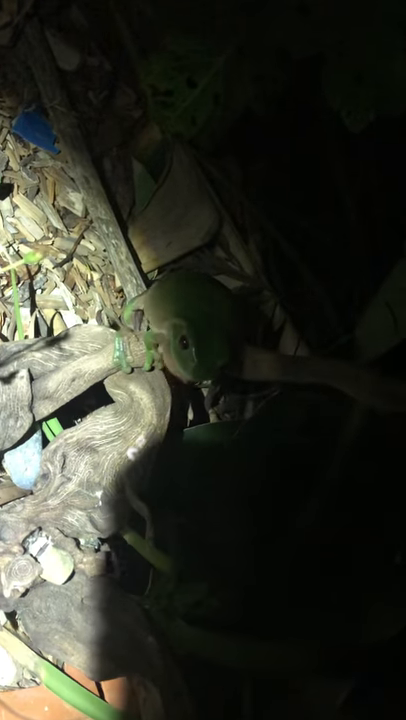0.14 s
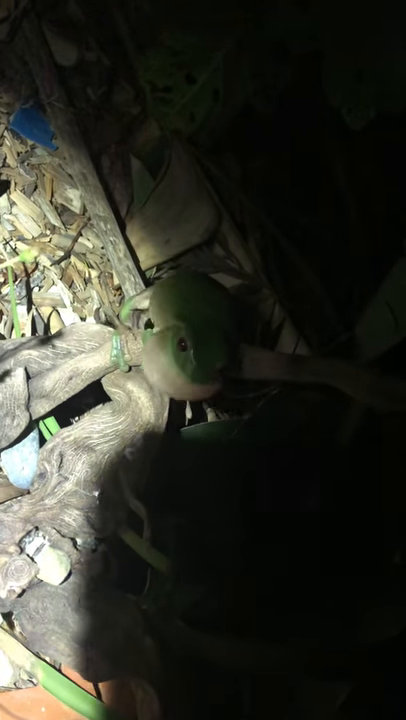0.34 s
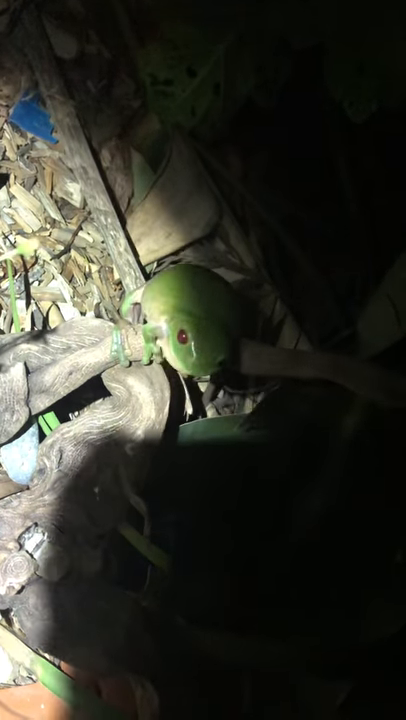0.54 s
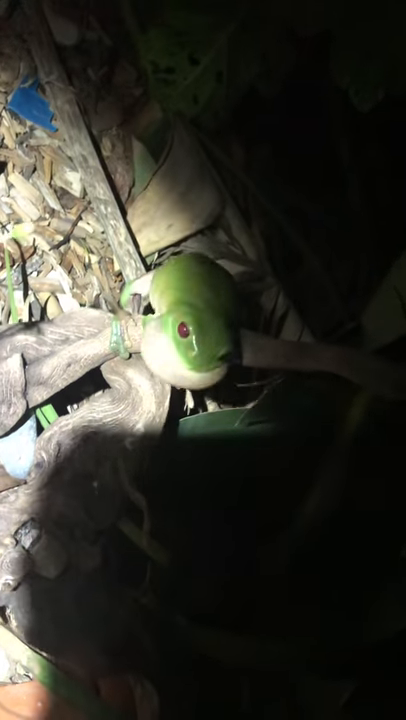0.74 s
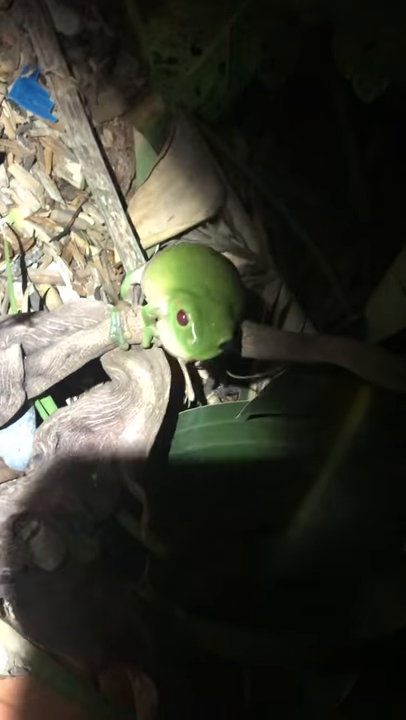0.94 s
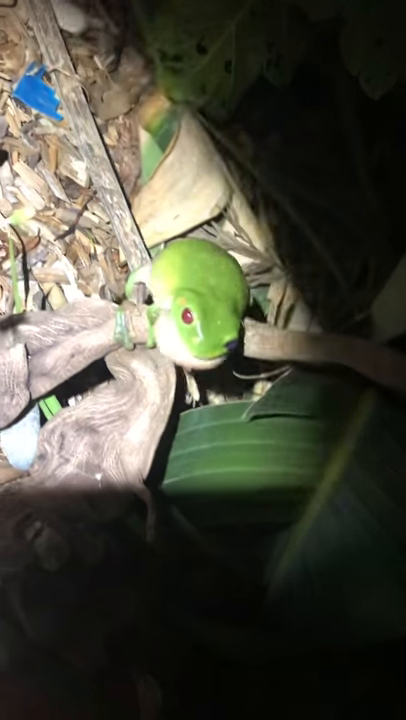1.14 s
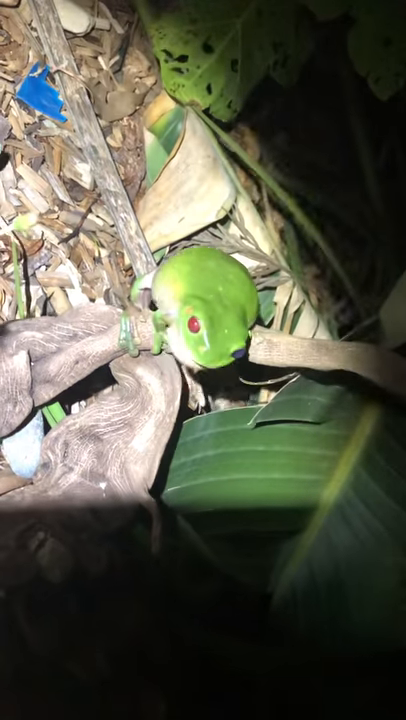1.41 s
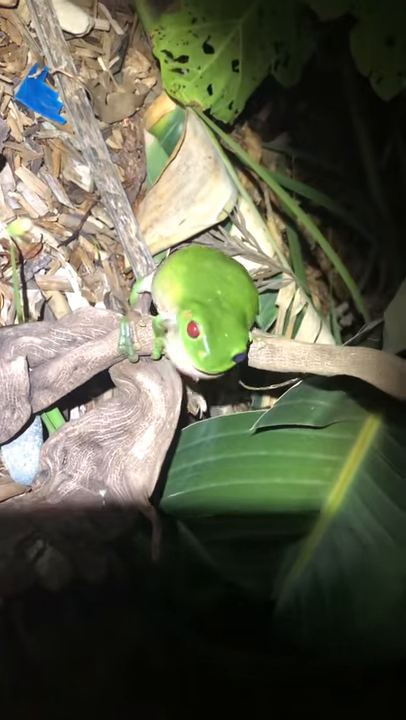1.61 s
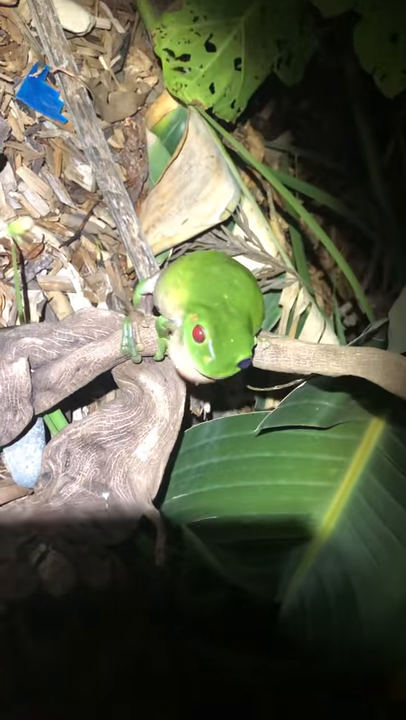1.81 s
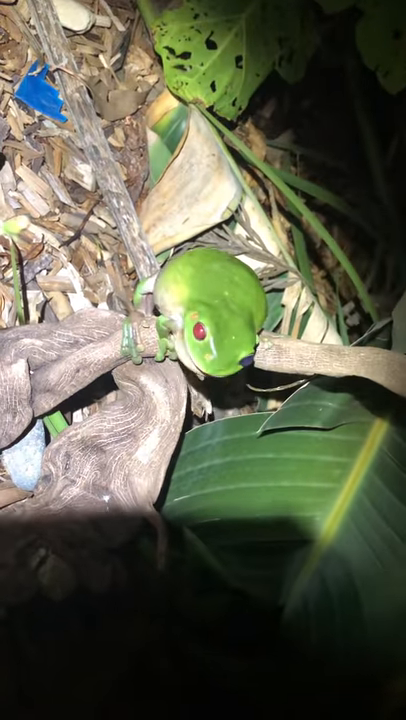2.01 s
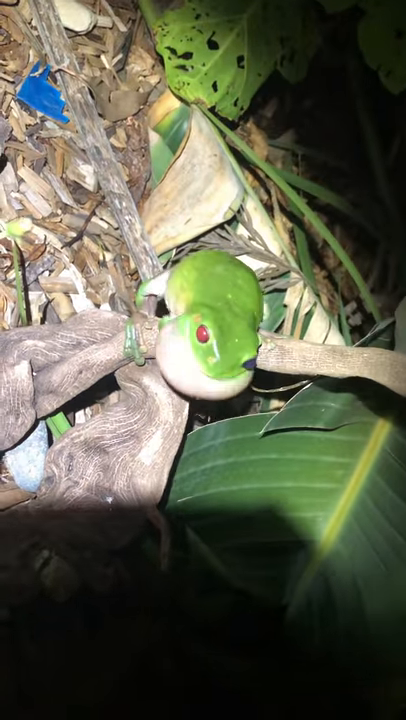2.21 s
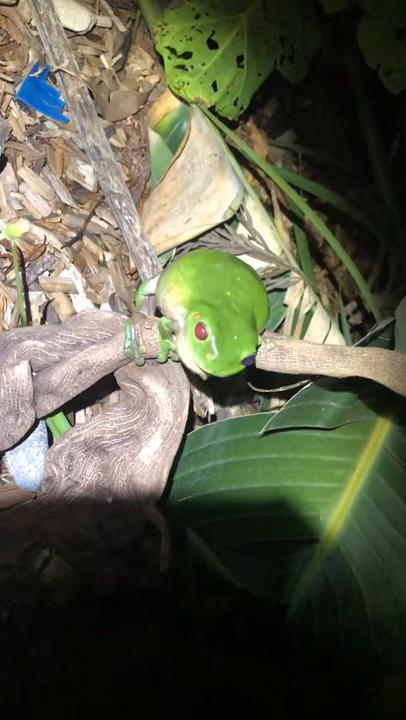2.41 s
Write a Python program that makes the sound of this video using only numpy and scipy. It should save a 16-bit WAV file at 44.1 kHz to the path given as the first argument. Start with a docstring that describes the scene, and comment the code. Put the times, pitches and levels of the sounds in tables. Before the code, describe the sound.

Close to the microphone, a tree frog croaks harshly five times, about twice a second. A softer, farther frog calls between the croaks and once afterward, with tiny dry clicks and a faint hum of night creatures among the leaves.

```python
"""Night among leaves: over a low rumble and a faint chorus, a far frog is just ending a call.
Then a tree frog croaks five times close by, each croak a train of larynx pulses ringing the vocal sac.
The pulses run evenly as it swells, then limp in pairs or threes (the fourth croak holds one run),
and the pitch sags as it stops. The far frog answers in each gap, with a few tiny dry clicks between,
and calls once more after the last croak."""
import sys
import numpy as np
from scipy import signal
from scipy.fft import rfft, irfft, next_fast_len
from scipy.io import wavfile
from scipy.ndimage import uniform_filter1d, minimum_filter1d, map_coordinates

SR = 44100
rng = np.random.default_rng(int(sys.argv[2]) if len(sys.argv) > 2 else 0)


def generate_wav(sig):
    """Save sig (samples, or channels by samples) to the path in sys.argv[1] as 16-bit PCM at SR."""
    pcm = np.round(np.clip(np.atleast_2d(sig).T, -1, 1) * 32767).astype(np.int16)
    wavfile.write(sys.argv[1], SR, pcm)


N = 112454
PULSE = 2048  # samples in the ring of one pulse
T = np.arange(PULSE) / SR

RISE_GAP_MS, LONG_GAP_MS = 7.3, 7.84  # between pulses while swelling; between groups
SLACK_MS, SETTLE_S = 1.1, 0.027  # the gap within a group starts longer and settles
TIRING, TIRING_S = 0.054, 0.049  # pulses slow by this share as the croak runs out
FILL_LEAD_S, FILL_S = 0.046, 0.071  # the sac tightens from just before full effort
BRIGHT_EFFORT, SAG_S = 0.37, 0.079  # effort that fully opens the tone; length of the final sag
SAC_DB, LEADER_DB, SCATTER_DB = 22.5, -4, 2.42  # sac gain; trim on a group's first pulse; random spread
RASP_DB, RASP_T60_S = -27.5, 0.028  # air in each pulse
ANSWER_S, ANSWER_RISE_S, ANSWER_GAP_MS, ANSWER_JITTER_MS, ANSWER_DB = 0.29, 0.11, 7.7, 0.3, 2.5
NEAR_WET_DB, FAR_WET_DB = -27, -2.5  # sends to the garden's reverb


def amp(db):
    """Decibels to amplitude."""
    return 10 ** (np.asarray(db) / 20)


def unit(x):
    """Scale to rms 1."""
    return x / np.sqrt(np.mean(x ** 2) + 1e-20)


def along(points, hz):
    """Read a curve of (Hz, value) points on a log frequency axis."""
    f, v = np.transpose(points)
    return np.interp(np.log(hz + 1), np.log(f + 1), v)


def filtered(x, response):
    """Equalise x with a gain that is a function of frequency."""
    m = next_fast_len(N + SR // 2)
    return irfft(rfft(x, m) * response(np.fft.rfftfreq(m, 1 / SR)), m)[:N]


def noise(spectrum):
    """Coloured noise of rms 1."""
    return unit(filtered(rng.standard_normal(N), lambda hz: amp(along(spectrum, hz))))


def wobble(rate):
    """A smooth random curve, rate knots a second."""
    return map_coordinates(rng.standard_normal(int(N * rate / SR) + 4), [np.arange(N) * rate / SR])


def ring(spectrum):
    """The minimum-phase ring of a body with this spectrum."""
    cepstrum = irfft(np.log(amp(along(spectrum, np.fft.rfftfreq(PULSE, 1 / SR)))))
    cepstrum[1:PULSE // 2] *= 2
    cepstrum[PULSE // 2 + 1:] = 0
    return irfft(np.exp(rfft(cepstrum)))


def add(track, s, sound):
    """Mix a sound into the track at time s."""
    i = round(s * SR)
    if 0 <= i < N:
        track[i:i + len(sound)] += sound[:N - i]


def night(rumble_db=-58, waver_db=1.5):
    """The bed: low rumble and the wavering bands of distant frogs and insects."""
    # The rumble's tone. Each row: frequency in Hz, relative level in dB.
    rumble = [(20, -31), (55, -3), (100, 0), (160, -5), (240, -9.5), (500, -17.5), (900, -19),
              (2500, -30.5), (5000, -35.5), (16000, -41.5)]
    # The chorus bands. Each row: centre in Hz, half-width in Hz, level in dB.
    chorus = [(1050, 43, -63), (1665, 90, -62), (3130, 73, -79.5), (6830, 120, -80)]
    bed = amp(rumble_db) * noise(rumble)
    for centre, width, db in chorus:
        band = filtered(rng.standard_normal(N), lambda hz: 1 / (1 + ((hz - centre) / width) ** 2))
        bed += unit(band) * amp(db + waver_db * wobble(34))
    return bed


def garden(x, predelay_s=0.013):
    """Scatter from plants and walls; each frequency dies at its own speed."""
    # The tail's length. Each row: frequency in Hz, t60 in seconds.
    decay = [(150, 0.21), (400, 0.16), (1150, 0.25), (3200, 0.38), (10000, 0.092)]
    # The tail's tone. Each row: frequency in Hz, gain in dB.
    colour = [(150, -13.5), (280, -12.5), (385, -4), (480, -12), (700, -8), (1150, -1), (1500, -7.5),
              (2200, -6.5), (3100, -5.5), (3900, -5.5), (10000, -5.5)]
    hz, t, bands = signal.stft(rng.standard_normal(SR // 2), SR, nperseg=256)
    tail = signal.istft(bands * amp(-60 * t / along(decay, hz)[:, None]), SR, nperseg=256)[1]
    delayed = np.pad(x, (round(predelay_s * SR), 0))
    wet = signal.fftconvolve(delayed, tail / np.linalg.norm(tail))[:N]
    return filtered(wet, lambda hz: amp(along(colour, hz)))


def ticks():
    """A few tiny dry clicks, each a fast-dying burst of noise."""
    # The clicks. Each row: start in seconds, level in dB, t60 in seconds.
    clicks = [(0.6327, -41.5, 0.0095), (0.847, -52, 0.0069), (1.593, -57, 0.058), (2.493, -62, 0.063)]
    # Their tone. Each row: frequency in Hz, relative level in dB.
    colour = [(300, -10), (3000, 3), (6000, -2), (15000, -8)]
    envelope = np.zeros(N)
    for s, db, t60 in clicks:
        add(envelope, s, amp(db - 60 * T / t60))
    return envelope * noise(colour)


def sac_lag(pulse, centre_hz=1450, q=2.14):
    """The sac takes a moment to respond: an all-pass makes its main ring build up before it dies."""
    hz = np.fft.rfftfreq(PULSE, 1 / SR)
    pole = centre_hz ** 2 - hz ** 2 + 1j * hz * centre_hz / q
    return irfft(rfft(pulse) * np.conj(pole) / pole)


def far_frog():
    """A second frog answers: near-even pulses swell, hold and stop short."""
    # Its calls. Each row: stop in seconds, relative level in dB.
    answers = [(0.046, -1.5), (.496, -2), (.971, -2.5), (1.443, -3), (1.906, -2), (2.371, -1.5)]
    # Its tone. Each row: frequency in Hz, relative level in dB.
    colour = [(100, -39), (270, -12), (340, 1), (385, 4), (450, -2), (520, -0.5), (620, -6.5), (900, -6),
              (1150, 8.5), (1400, -3.5), (1800, -12), (2550, -20), (3250, -13), (3600, -34.5),
              (4100, -47.5), (6300, -58.5), (7700, -38.5), (9000, -55), (16000, -70.5)]
    voice, pulse = np.zeros(N), sac_lag(ring(colour))
    for stop, db in answers:
        gap_luck, level_luck = rng.standard_normal((48, 2)).T
        times = stop - np.cumsum(ANSWER_GAP_MS + ANSWER_JITTER_MS * gap_luck) / 1000
        for s, luck in zip(times, level_luck):
            swell = np.clip((s - stop + ANSWER_S) / ANSWER_RISE_S, 0, 1)
            add(voice, s, swell * amp(ANSWER_DB + db + 1.6 * luck) * pulse)
    return voice


def larynx(full, rise, stop, group, short_ms, feeble_db=-46.5, swell_db=-5):
    """Pulses of one croak as (seconds, strength, leads a group): a swell, then groups that tire."""
    pulses, before = [], RISE_GAP_MS / 1000
    while before < rise:  # the swell, laid backwards from full effort
        early = before / rise
        strength = amp(feeble_db) + amp(swell_db) * (1 - early) ** 2.19
        pulses.insert(0, (full - before, strength, False))
        before += RISE_GAP_MS * (1 - 0.3 * early ** 2) / 1000  # the first pulses come closer
    s, k = full, 0
    while s < stop:
        pulses.append((s, 1, k % group == 0))
        k += 1
        gap_ms = LONG_GAP_MS if k % group == 0 else short_ms + SLACK_MS * np.exp((full - s) / SETTLE_S)
        s += gap_ms * (1 + TIRING * max(0, 1 - (stop - s) / TIRING_S)) / 1000
    return pulses


def vocal_sac(fill, pitch, opening, leads):
    """One ring of the sac: its tone shifts as it tightens; weak and leading pulses are duller."""
    # The sac's resonances. Each row: frequency in Hz, relative level in dB when slack, and when taut.
    resonances = [(60, -91, -38), (180, -38, -29), (252, -37, -7), (321.7, 11.5, 0.5), (405, 21, 13),
                  (440, -3, 8.5), (623, 8.5, 0.5), (800, 9.5, 5.5), (930, 17, 7), (1234, 19, 11),
                  (1502, 6.5, 15), (1659, -5, 4.5), (1808, -3.5, -11), (1990, 0, -3.5), (2740, -12.5, -14),
                  (3250, -9.5, -19.5), (3150, -52.5, -48.5), (4740, -47, -42), (5200, -64.5, -60.5),
                  (6200, -51, -67), (9860, -60, -74), (16000, -58.5, -72)]
    # EQ on the feeblest pulses. Each row: frequency in Hz, gain in dB.
    weak_eq = [(300, 9), (700, 3.5), (1000, 1), (1500, -21.5), (3000, -7), (4000, -27), (16000, -20)]
    # EQ on the first pulse of a group. Each row: frequency in Hz, gain in dB.
    leader_eq = [(1500, -1.5), (3000, -1), (6000, -3.5), (16000, -1.5)]
    hz, slack, taut = np.transpose(resonances)
    dull = (1 - opening) * along(weak_eq, hz) + leads * along(leader_eq, hz)
    level = slack + fill * (taut - slack) + dull
    return sac_lag(ring(np.c_[hz * pitch ** 0.38, level]))  # the sac follows only part of the sag


def throat(fill, pitch, opening, level_luck, attack_s=0.00034):
    """The throat's bright overtones for one pulse; they ring longer when it is taut."""
    # The overtones. Each row: frequency in Hz before bends, relative level in dB, slack t60 in seconds.
    overtones = [(3891, -17, 0.014), (4250, -27, 0.015), (5184, -38.5, 0.018), (8040, -43.5, 0.019),
                 (9900, -55, 0.024), (14700, -47.5, .012)]
    lowest_hz = overtones[0][0]
    glide = 1 - 0.13 * (1 - opening)  # they start flat and rise with effort
    ping = np.zeros(PULSE)
    for (hz, db, t60), luck in zip(overtones, level_luck):
        bend = glide * pitch ** (1 + 2 * (1 - lowest_hz / hz))  # higher ones sag further
        envelope = amp(db + 2 * luck - 60 * T / (t60 * 1.26 ** fill))
        ping += envelope * np.sin(2 * np.pi * hz * bend * T)
    return ping * (1 - np.exp(-T / attack_s)) ** 2


def near_frog():
    """The close frog: each larynx pulse rings sac and throat and lets out a rasp of air."""
    # The croaks. Each row: time of full effort, rise length, stop time and release length in seconds,
    # relative level in dB, pulses per group, short gap in ms, final sag as a share of pitch,
    # trim on overtones and rasp in dB.
    croaks = [(0.2444, 0.087, 0.3637, .018, -3.5, 2, 5.57, 0.06, 0.5),
              (0.6716, 0.074, .812, 0.025, -3.5, 2, 5.6, 0.08, 0.5),
              (1.1918, .1, 1.307, 0.014, -1.5, 2, 5.6, 0.07, 0),
              (1.6853, 0.095, 1.759, 0.024, -4.5, 12, 6.25, .06, -1.5),
              (2.133, 0.075, 2.273, 0.015, -6, 3, 6.0, 0.08, 0.5)]
    # The tone of the air. Each row: frequency in Hz, relative level in dB.
    rasp = [(100, -2), (2000, 27), (5000, -1), (6300, -48), (7500, 5), (10000, -15), (12500, -18),
            (15000, -6.5)]
    voice, air = np.zeros(N), np.zeros(N)
    for full, rise, stop, release, db, group, short_ms, sag, bright_db in croaks:
        pulses = larynx(full, rise, stop, group, short_ms)
        chance = rng.standard_normal((64, 8))  # per pulse: effort, timing, six overtone levels
        for (s, strength, leads), luck in zip(pulses, chance):
            fade = min(1, (stop - s) / release)
            effort = strength * fade * amp(SCATTER_DB * luck[0])
            fill = np.clip((s - full + FILL_LEAD_S) / FILL_S, 0, 1)
            pitch = 1 - sag * np.clip(1 - (stop - s) / SAG_S, 0, 1)
            opening = min(1, effort / BRIGHT_EFFORT)
            body = vocal_sac(fill, pitch, opening, leads) * effort * amp(SAC_DB + leads * LEADER_DB)
            # The bright edge grows as the sac fills, and fades faster than the body at the stop.
            edge = opening * fade * effort ** 0.69 * amp(bright_db - 4.5 * leads + 5 * fill)
            jitter_ms = 0.35 if s < full else 0.04
            at = s + jitter_ms * luck[1] / 1000
            add(voice, at, amp(db) * (body + edge * throat(fill, pitch, opening, luck[2:])))
            add(air, at, edge * amp(db + RASP_DB - 60 * T / RASP_T60_S))
    return voice + air * noise(rasp)


def scene():
    """The mono mix: the close frog nearly dry, the far one deep in the garden, clicks and the bed."""
    near, far = near_frog(), far_frog()
    reverb = garden(amp(NEAR_WET_DB) * near + amp(FAR_WET_DB) * far)
    return (near + far + reverb + ticks() + night())[None]


def record(dry):
    """A fast limiter holds the loudest pulses at full scale, then a steep low-pass trims the top."""
    top_hz = 15950
    needed = 1 / np.maximum(1, np.abs(dry[0]))
    held = minimum_filter1d(needed, size=161)
    gain = uniform_filter1d(uniform_filter1d(held, size=81), size=81)
    return filtered(dry[0] * gain, lambda hz: hz < top_hz)[None]


dry = scene()
out = record(dry)
generate_wav(out)
```